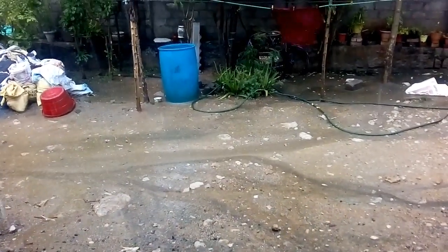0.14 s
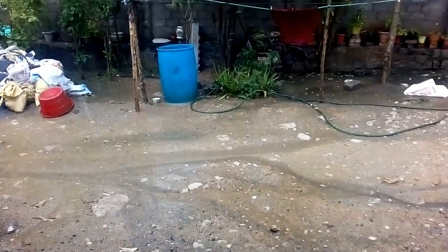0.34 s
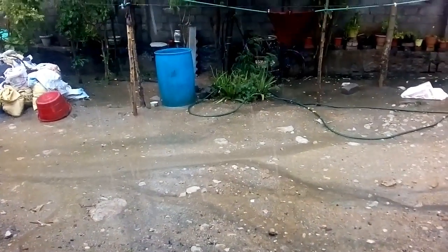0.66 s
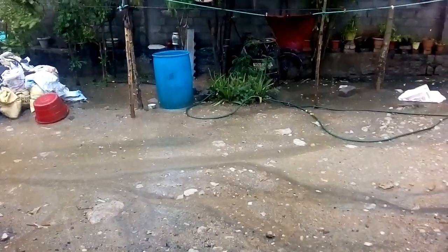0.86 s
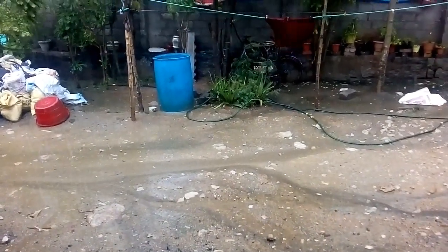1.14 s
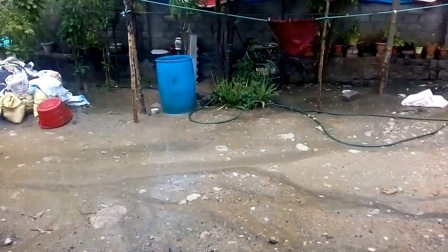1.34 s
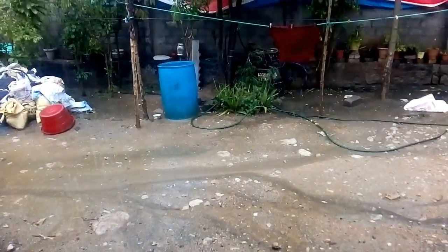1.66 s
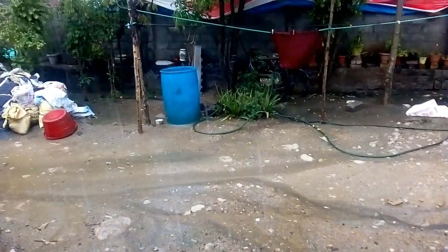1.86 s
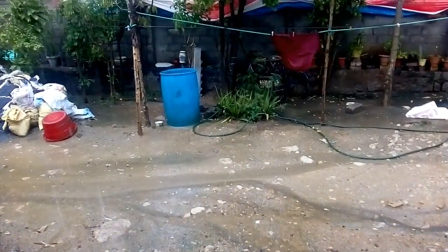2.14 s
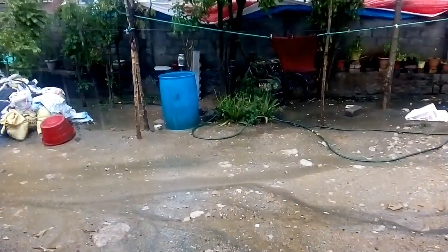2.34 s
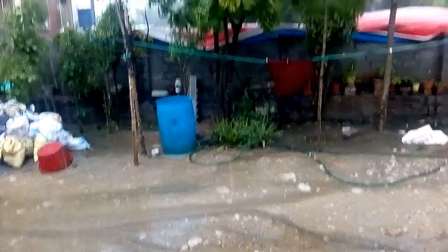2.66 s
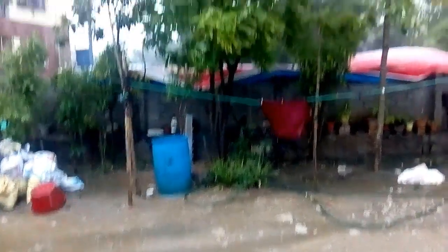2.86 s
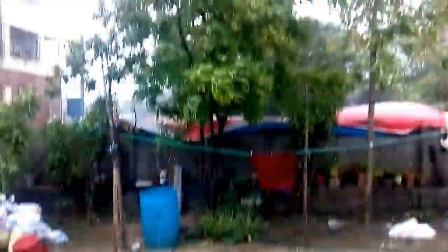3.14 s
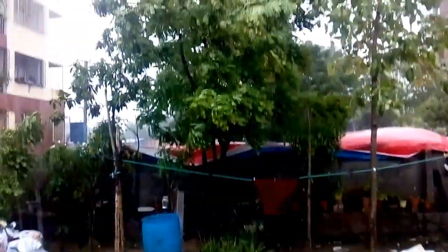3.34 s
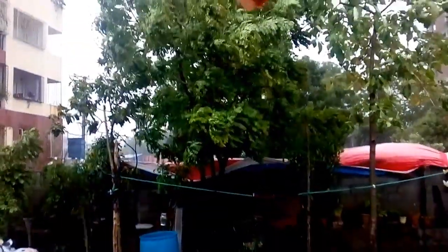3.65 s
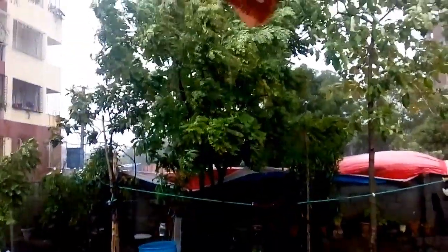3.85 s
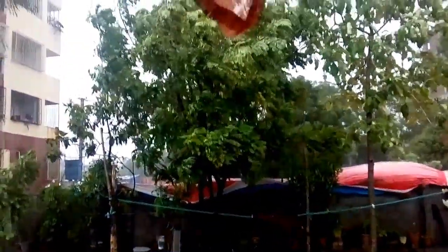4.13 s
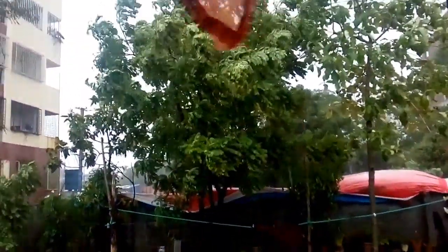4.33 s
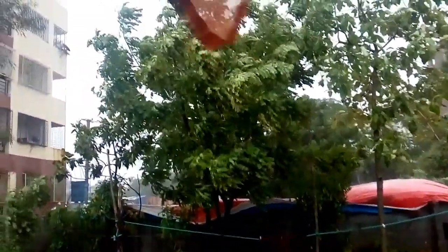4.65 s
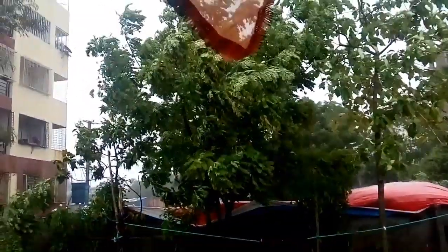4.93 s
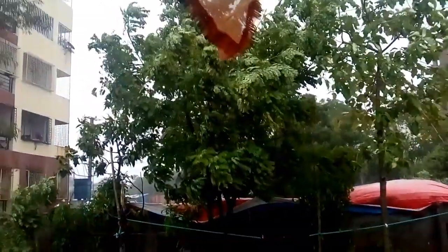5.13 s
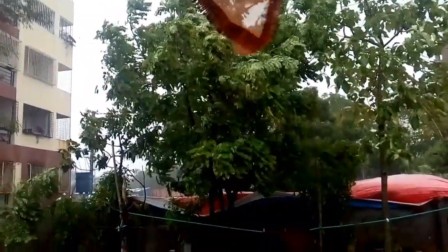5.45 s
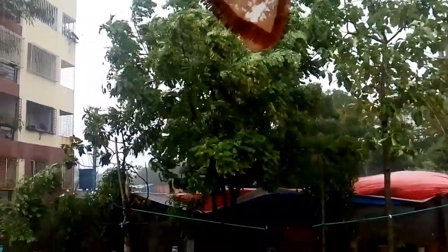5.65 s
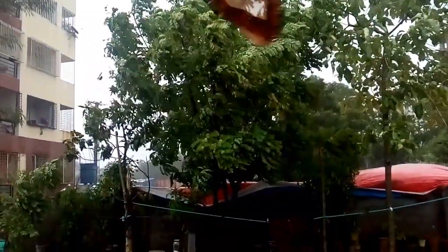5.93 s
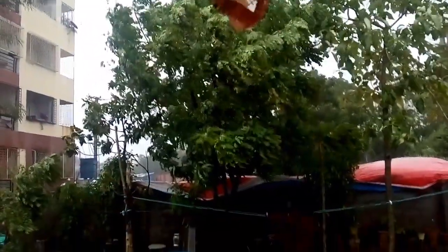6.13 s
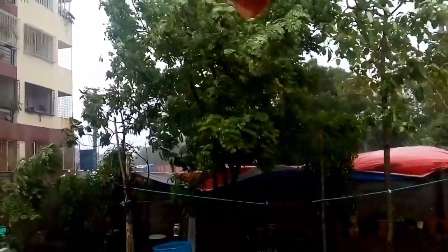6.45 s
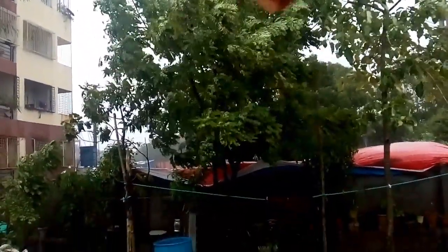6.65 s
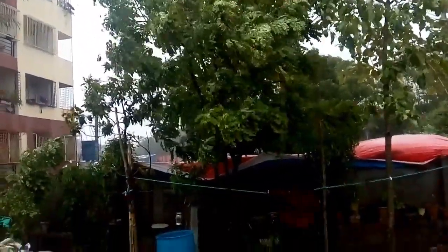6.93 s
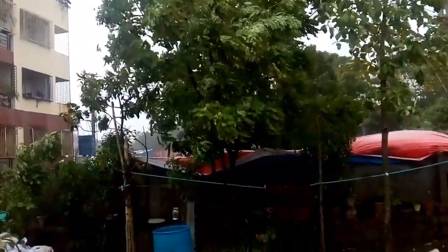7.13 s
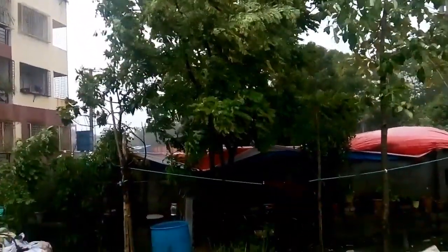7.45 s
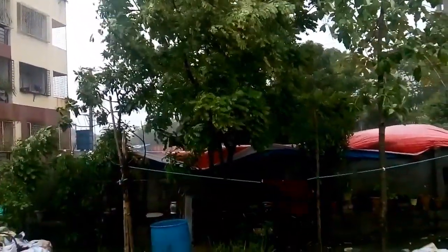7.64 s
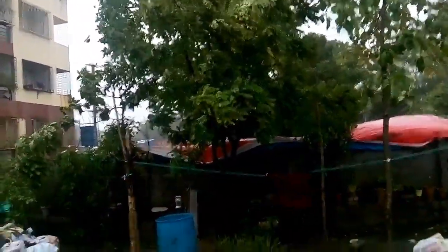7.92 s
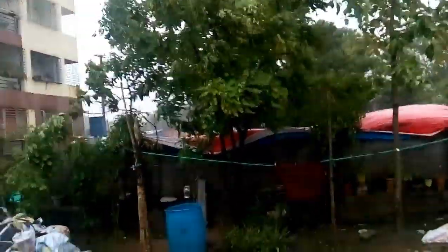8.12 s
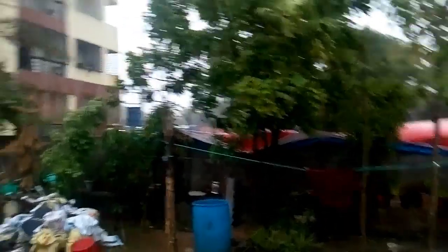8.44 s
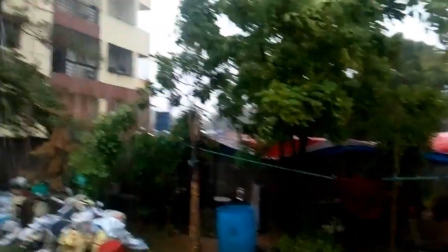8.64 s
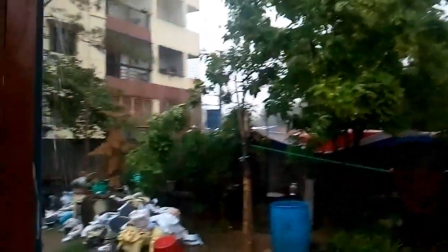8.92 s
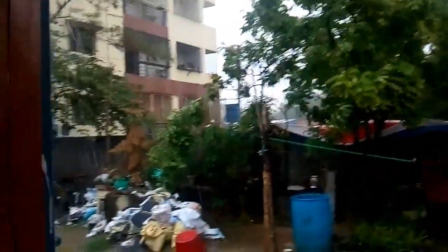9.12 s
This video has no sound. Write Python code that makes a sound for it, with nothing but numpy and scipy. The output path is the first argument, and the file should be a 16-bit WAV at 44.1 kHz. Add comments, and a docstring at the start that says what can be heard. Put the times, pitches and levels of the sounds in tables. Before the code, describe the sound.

Steady rain on a wet dirt yard, heard from a doorway. A fine bright hiss and dense patter run throughout, over a soft far wash on leaves and roofs. Hard close drops tick, smack and plink irregularly, several per second. A faint distant drone swells before three seconds and fades. The small microphone sounds bright and crisp, dipping briefly around the hardest drops.

```python
"""From a doorway: steady rain on a puddled dirt yard, trees behind, with a far wash and a faint whine throughout.
From the start fine spray hisses, far drops merge and nearer ones patter; close ones smack and ring as bubbles.
A far drone swells to its peak at 2.7 s; the shower eases near 5 s, freshens near 7.9 s, then slackens slightly.
Drops are noise bursts and rising sines; spray and wash are coloured noise; drone and whine are resonated noise.
The small microphone is bright near 6.5 kHz, and its gain control ducks the whole yard around each hard drop."""
import sys
import numpy as np
from scipy import signal
from scipy.fft import rfft, irfft
from scipy.io import wavfile
from scipy.ndimage import uniform_filter1d, minimum_filter1d

SR = 44100
rng = np.random.default_rng(int(sys.argv[2]) if len(sys.argv) > 2 else 0)


def int16_out(signal):
    """Quantize to a 16-bit WAV file."""
    q = np.round(np.clip(np.atleast_2d(signal).T, -1, 1) * 32767)
    wavfile.write(sys.argv[1], SR, q.astype(np.int16))


N = 409688
TIME = np.arange(N) / SR

# far rain on leaves and roofs over the rumble of the town, spectrum shape: (frequency [Hz], relative level [dB per Hz])
WASH_SPECTRUM = [(20, -18), (42, -3.5), (65, -4.5), (100, 0.5), (150, 3.5), (280, 2.5), (370, 4), (550, 0),
                 (1100, 2), (1700, -3), (3000, -6), (8000, -33)]
# fine spray, spectrum shape: (frequency [Hz], relative level [dB per Hz])
SPRAY_SPECTRUM = [(300, -25), (900, -6.5), (1700, 9), (3000, 6.5), (6500, 1.5), (16000, -2)]
# strength of the shower, heard as the hiss of the yard: (time [s], relative level [dB])
SHOWER_LEVEL = [(0, -20.5), (1.9, -21), (2.6, -21), (4.4, -21), (5.1, -22.5), (7.3, -22.5), (7.9, -21.5),
                (8.5, -22), (9.29, -22.3)]
# a big, low bubble takes more of its drop's energy than a tiny, high one: (pitch [Hz], energy share [0-1])
BUBBLE_ENERGY = [(3200, 0.63), (4400, 0.17), (6000, 0.11)]
# the hardest drops, close to the doorway: (time [s], relative level [dB], starting bubble pitch [Hz])
HARD_DROPS = [(0.083, -0.5, 3970), (0.201, 2, 3270), (0.3761, -4.5, 6150), (0.4394, -2, 2150),
              (0.4471, 3.5, 7560), (0.473, -5, 5450), (0.497, -1, 3800), (0.567, -3.5, 3700),
              (0.7225, 3, 6400), (0.768, -1.5, 6060), (0.944, -2, 6730), (1.241, -0.5, 6000),
              (1.3577, -3, 6060), (1.452, -3, 5240), (1.6815, 0.5, 5000), (1.8097, -4.5, 5900),
              (2.197, -6, 5860), (2.2214, 1.5, 4230), (2.4442, -4.5, 5900), (2.738, -6, 3580),
              (3.461, 2, 6400), (3.5053, 3, 5500), (3.7032, -3, 6300), (3.7171, 0, 5000),
              (3.9731, -3, 6600), (4.3964, -4, 6550), (4.5253, -1, 3300), (4.5368, 0, 3660),
              (4.5866, -3.5, 5700), (4.9408, -6, 2840), (5.0288, -4, 6650), (5.0835, -1.5, 6670),
              (5.1727, -2, 6400), (5.2503, 1.5, 6240), (5.425, -3.5, 5800), (5.5537, -14, 2970),
              (5.925, -4, 1800), (6.093, -3, 7050), (6.3892, -1, 5730), (6.455, -4, 6800),
              (7.2843, -9, 2870), (7.3042, -6, 5830), (7.7566, -3, 5200), (7.887, -7, 6700),
              (8.2654, -9, 2610), (8.3058, -0.5, 4030), (8.5866, -4, 5300), (8.783, -1.5, 5600),
              (8.832, -3, 4400), (9.0535, -5.5, 3860), (9.2334, -2.5, 5900)]
# microphone colour: (frequency [Hz], gain [dB])
MICROPHONE_RESPONSE = [(1500, -14), (2000, -12.5), (2600, -7.5), (3100, -5.5), (3700, -7), (4300, -8),
                       (5400, -2), (6650, 2.5), (7300, -4.5), (8200, -16.5), (10500, -14), (12200, -24.5),
                       (14400, -17), (15600, -22)]

DRONE_PEAK_S, DRONE_PEAK_DB, DRONE_SWELL_S = 2.7, -34, 0.78
WASH_DB = -24
STRAY_DB, STRAY_SPREAD_DB = -7, 0.5
STRAY_HZ, STRAY_SPREAD_OCTAVES = 6850, 0.35   # highest bubble pitch; typical fall below it
CUTOFF_HZ = 15900


def from_db(db):
    """Decibels to amplitude gain."""
    return 10 ** (np.asarray(db) / 20)


def rms_one(x):
    """Scale to unit power."""
    return x / np.sqrt(np.mean(x ** 2) + 1e-20)


def noise():
    """White noise for the whole scene."""
    return rng.standard_normal(N)


def drift(corner_hz):
    """Smooth random wander with spread 1: noise through two equal low-pass poles."""
    step = 40   # samples between computed points
    pole = np.exp(-2 * np.pi * corner_hz * step / SR)
    raw = rng.standard_normal(N // step + 2002)
    slow = signal.lfilter([1], [1, -2 * pole, pole * pole], raw)[2000:]   # drop the filter's start-up
    return np.interp(np.arange(N) / step, np.arange(len(slow)), rms_one(slow))


def colour(x, points, size=8192):
    """Causal (minimum-phase) filter through the given (frequency [Hz], gain [dB]) points."""
    hz, db = np.transpose(points)
    grid = np.maximum(np.fft.rfftfreq(size, 1 / SR), 1)
    log_gain = np.log(from_db(np.interp(np.log(grid), np.log(hz), db)))
    # folding the cepstrum onto positive time makes the phase minimum
    cepstrum = irfft(log_gain)
    cepstrum[1:size // 2] *= 2
    cepstrum[size // 2 + 1:] = 0
    impulse = irfft(np.exp(rfft(cepstrum)))
    return signal.fftconvolve(x, impulse)[:N]


def high_pass(x, hz, order=2):
    """Remove the bass."""
    return signal.sosfilt(signal.butter(order, hz, "high", fs=SR, output="sos"), x)


def ring(x, hz, width_hz):
    """One resonance: a two-pole filter whose decay sets its width."""
    r = np.exp(-np.pi * width_hz / SR)
    return signal.lfilter([1, 0, -1], [1, -2 * r * np.cos(2 * np.pi * hz / SR), r * r], x)


def hum(hz, width_hz):
    """Resonated noise, the more wavering and breathy the wider it is; unit power."""
    return rms_one(ring(noise(), hz, width_hz))


def whine():
    """A faint, narrow tone throughout."""
    return from_db(-41) * hum(hz=393, width_hz=5)


def drone():
    """A far drone, perhaps traffic: loudest as it passes, its level falling with distance before and after."""
    distance = np.hypot(1, (TIME - DRONE_PEAK_S) / DRONE_SWELL_S)   # 1 at the nearest point
    return from_db(DRONE_PEAK_DB) / distance * hum(hz=422, width_hz=107)


def far_wash():
    """Countless distant drops merge into steady coloured noise."""
    return from_db(WASH_DB) * rms_one(colour(noise(), WASH_SPECTRUM))


def fine_spray():
    """Fine spray is bright coloured noise whose level flickers slightly."""
    flicker = from_db(-1.5 + 0.5 * drift(corner_hz=20))
    return flicker * rms_one(colour(noise(), SPRAY_SPECTRUM))


def unit_energy(rows):
    """Scale each row to unit energy."""
    return rows / np.linalg.norm(rows, axis=1, keepdims=True)


def splashes(start_s, level_db, bubble_hz, bubble_share, smack_s, size=384):
    """Each drop is a sharp noisy smack plus a trapped bubble that rings a few cycles, rising in pitch."""
    t = np.arange(size) / SR
    chance = rng.standard_normal((len(start_s), size + 2))
    decay_s = smack_s * np.exp(0.6 * chance[:, :1])
    smack = chance[:, 2:] * np.sqrt(t) * np.exp(-t / decay_s)

    cycles = bubble_hz[:, None] * t
    life_cycles = 1.4 * np.exp(0.3 * chance[:, 1:2])
    rising_cycles = cycles * (1 + 0.0029 * cycles)
    bubble = np.sin(2 * np.pi * rising_cycles) * cycles * np.exp(-cycles / life_cycles)

    share = np.clip(bubble_share, 0, 1)[:, None]
    drops = np.sqrt(1 - share) * unit_energy(smack) + np.sqrt(share) * unit_energy(bubble)
    # a drop's level is its energy expressed as an rms over 1.5 ms
    drops = drops * from_db(level_db)[:, None] * np.sqrt(0.0015 * SR)
    at = np.abs(start_s * SR).astype(int)[:, None] + np.arange(size)
    return np.bincount(at.ravel(), drops.ravel(), N)[:N]


def patter(count, spread_db, low_hz, high_hz, bubbly, smack_s):
    """Drops at random moments and distances: many faint, few strong; unit power."""
    when, area, pitch, share = rng.random((count, 4)).T
    # drops fall evenly over the ground, so most land near the far edge; power falls with distance squared
    level_db = -10 * np.log10(area + from_db(-2 * spread_db))
    bubble_hz = low_hz * (high_hz / low_hz) ** pitch
    return rms_one(splashes(when * N / SR, level_db, bubble_hz, bubbly * share ** 2, smack_s))


def far_patter():
    """A dense field of far drops with a wide range of levels."""
    return from_db(-2.5) * patter(count=9000, spread_db=18, low_hz=1790, high_hz=6870,
                                  bubbly=0.76, smack_s=0.00046)


def middle_patter():
    """Fewer drops at middle distance, closer to one another in level."""
    return from_db(-0.4) * patter(count=1500, spread_db=8, low_hz=2270, high_hz=7250,
                                  bubbly=0.5, smack_s=0.00058)


def bubble_share_at(bubble_hz):
    """Share of a drop's energy that its bubble takes at this pitch."""
    return np.interp(bubble_hz, *np.transpose(BUBBLE_ENERGY))


def stray_drops(count):
    """Single ticks at random moments, mostly high, now and then a lower plink."""
    level, pitch = rng.standard_normal((count, 2)).T
    start_s = rng.random(count) * N / SR
    level_db = STRAY_DB + STRAY_SPREAD_DB * level
    bubble_hz = STRAY_HZ * 2 ** (-STRAY_SPREAD_OCTAVES * np.abs(pitch))
    return splashes(start_s, level_db, bubble_hz, bubble_share_at(bubble_hz), smack_s=0.00054)


def hard_drops():
    """The closest drops; the pitch of the bubble sets how much each one rings."""
    start_s, level_db, bubble_hz = np.transpose(HARD_DROPS)
    drops = splashes(start_s, level_db, bubble_hz, bubble_share_at(bubble_hz), smack_s=0.00037)
    return from_db(0.7) * drops


def yard(x, t60_s):
    """Droplets and reflections off ground and walls trail each drop as a short diffuse fizz, duller than it."""
    keep = from_db(-120 / (t60_s * SR))   # power falls 60 dB in t60_s
    power = signal.lfilter([1 - keep], [1, -keep], x ** 2 + 1e-18)
    fizz = signal.sosfilt(signal.butter(1, 7000, fs=SR, output="sos"), noise())
    return np.sqrt(power) * rms_one(fizz)


def scene():
    """Drone, whine and wash behind; spray and patter follow the shower; close drops in front."""
    shower = from_db(np.interp(TIME, *np.transpose(SHOWER_LEVEL)))
    background = whine() + drone() + far_wash()
    spray = shower * fine_spray()
    drops = shower * (far_patter() + middle_patter()) + stray_drops(count=45) + hard_drops()
    tails = from_db(-9) * yard(drops, t60_s=0.035)
    # drops are too small to radiate bass
    return (background + spray + high_pass(drops + tails, hz=940))[None]


def gain_control(x, threshold_db, slope, release_db_per_s, hold_s, ahead_s):
    """The gain sinks just ahead of a loud drop, holds, then climbs back at a steady rate in dB."""
    power = np.abs(uniform_filter1d(x ** 2, size=110))   # 2.5 ms average
    level_db = 10 * np.log10(power + 1e-12)
    cut_db = slope * np.maximum(level_db - threshold_db, 0)
    hold, ahead = int(hold_s * SR) + 1, int(ahead_s * SR) + 1
    # hold each cut, looking back in time
    cut_db = -minimum_filter1d(-cut_db, hold, origin=(hold - 1) // 2)
    release_db = release_db_per_s * TIME
    cut_db = np.maximum.accumulate(cut_db + release_db) - release_db
    # widen each cut, then smooth it, so that the gain is already down when the drop arrives
    gain_db = uniform_filter1d(minimum_filter1d(-cut_db, ahead), ahead)
    return x * from_db(gain_db)


def record(dry):
    """Microphone colour, gain control, rounded peaks and a steep top cut."""
    x = high_pass(colour(dry[0], MICROPHONE_RESPONSE), hz=22, order=1)
    x = gain_control(x, threshold_db=-17.8, slope=0.65, release_db_per_s=165, hold_s=0.011, ahead_s=0.008)
    x = 0.85 * np.tanh(x / 0.85)
    # 0.1 dB ripple below the cutoff, 90 dB down above it
    top_cut = signal.ellip(12, 0.1, 90, CUTOFF_HZ, fs=SR, output="sos")
    return signal.sosfilt(top_cut, x)[None]


dry = scene()
out = record(dry)
int16_out(out)
```